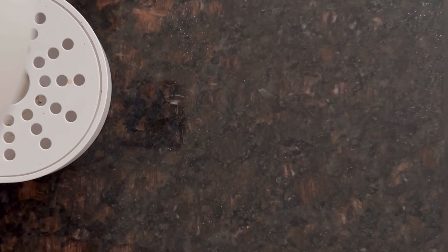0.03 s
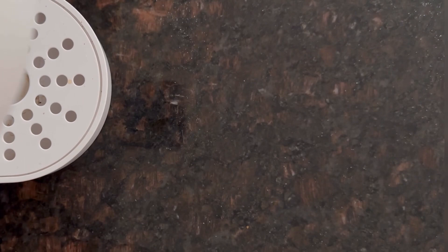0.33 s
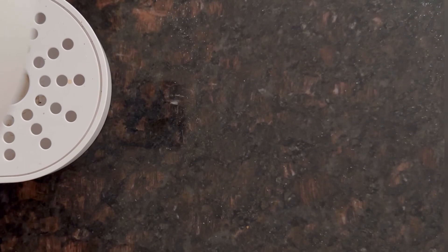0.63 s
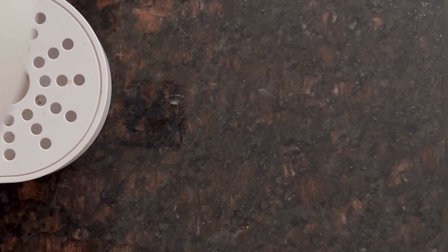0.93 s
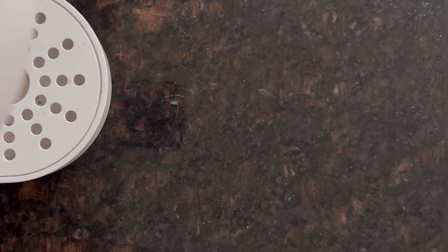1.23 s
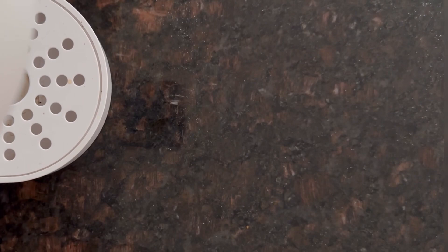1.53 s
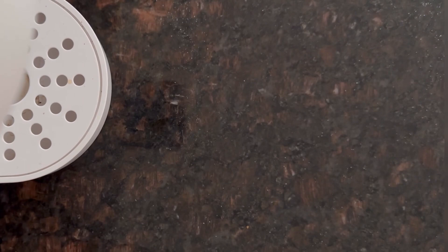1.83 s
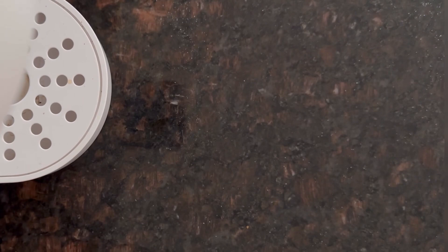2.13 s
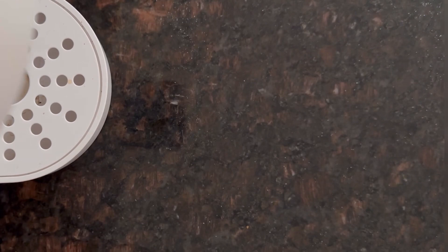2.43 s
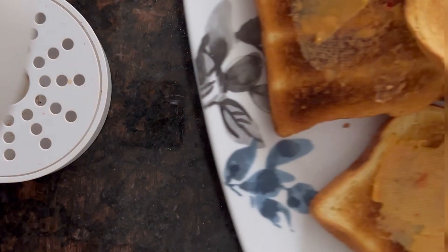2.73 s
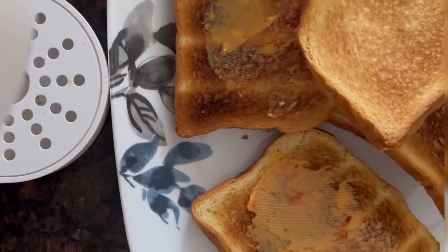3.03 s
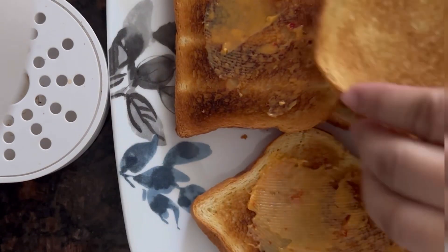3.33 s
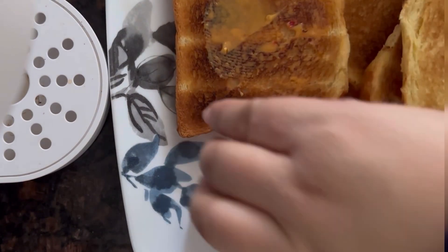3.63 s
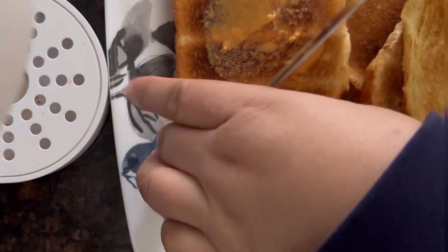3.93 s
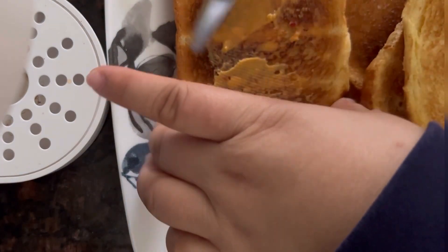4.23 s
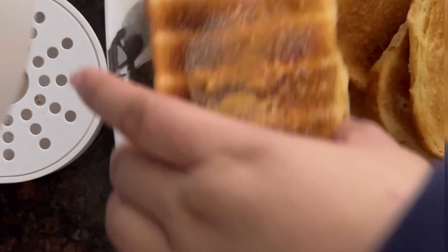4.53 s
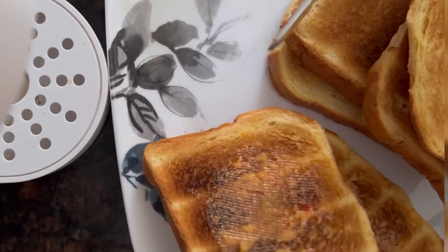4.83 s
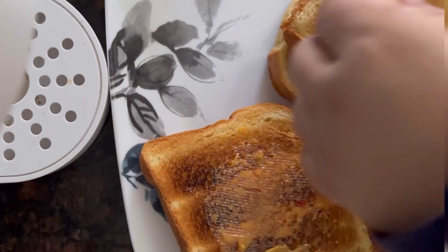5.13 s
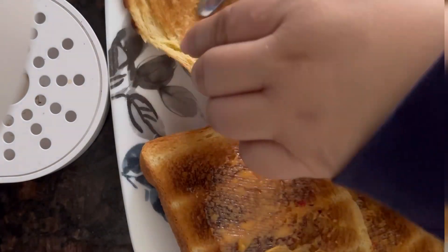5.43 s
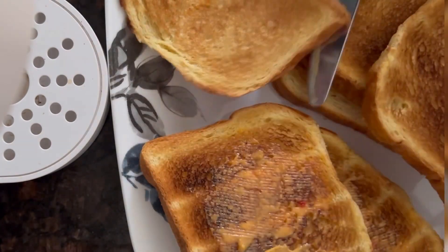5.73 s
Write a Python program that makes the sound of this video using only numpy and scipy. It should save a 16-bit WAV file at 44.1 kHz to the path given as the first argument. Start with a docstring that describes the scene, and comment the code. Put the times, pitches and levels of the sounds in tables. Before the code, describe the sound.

A china plate is set down on a stone counter, then toast rustles and a knife scrapes and clinks over a low appliance hum.

```python
"""Toast on a kitchen counter

An appliance hums in a small room. Sleeves rustle and things scuff softly as a plate of toast is
fetched. The china knocks on the stone counter, rings and slides into place. Dry slices rub and
crackle as they are shifted, and a table knife scrapes over one in four quick strokes and clinks on
the plate. Each rub is a stream of tiny slips; each knock is a short crack plus fading tones."""
import sys
import numpy as np
from scipy import signal
from scipy.fft import rfft, irfft, next_fast_len
from scipy.io import wavfile

SR = 44100
rng = np.random.default_rng(int(sys.argv[2]) if len(sys.argv) > 2 else 0)


def write(x):
    x = np.atleast_2d(x).T
    wavfile.write(sys.argv[1], SR, np.round(np.clip(x, -1, 1) * 32767).astype(np.int16))


N = 258867
TIME = np.arange(N) / SR

# Levels in the tables are relative. A "colour" says how strong a noise is from low to high pitch.
# slow swells of the motor note: time_s, level_db
MOTOR_SWELLS = [(0.1, -52.5), (0.3, -51.5), (0.7, -52.5), (1.09, -50), (1.94, -54.5), (2.18, -53),
                (2.36, -48.5), (2.77, -52), (3.11, -48), (3.72, -51), (4.41, -48.5), (5.06, -52.5),
                (5.43, -47.5), (5.75, -51)]
# wavering tones of the appliance: pitch_hz, width_hz, level_db
HUM_TONES = [(178, 58, -64.5), (360.6, 17, -65.5), (630, 32, -77)]
# colour of the rushing air: pitch_hz, level_db
AIR_COLOUR = [(25, -51), (55, -36), (90, -4.5), (130, 0.5), (200, -2.5), (300, -1), (450, -7.5), (700, -16),
              (1200, -21.5), (3000, -30.5), (5000, -29.5), (6700, -24), (9000, -32.5), (15000, -35)]

# moves of the sleeve and things handled nearby: start_s, rise_s, hold_s, swish_db, scuff_db, ring_db
HANDLING_MOVES = [(0.022, 0.027, 0.0059, -50.5, -55, -52), (0.108, 0.014, 0.0097, -65, -82, -83),
                  (0.24, 0.016, .05, -74, -75, -80), (0.35, 0.0085, .016, -66, -72, -84),
                  (0.381, 0.0067, 0.015, -52, -59, -57.5), (0.457, 0.0045, 0.0027, -55.5, -80, -90),
                  (0.775, 0.02, 0.05, -92, -73, -68), (0.909, 0.013, 0.025, -52.5, -50, -49),
                  (1.056, 0.017, 0.0091, -64.5, -56, -55.5), (1.09, 0.078, 0.045, -54.5, -63.5, -69),
                  (1.215, 0.027, 0.013, -51, -63.5, -57), (1.265, 0.015, 0.02, -62, -59, -61.5),
                  (1.321, .013, 0.011, -38, -39, -38), (1.385, 0.027, 0.014, -56, -52, -53),
                  (1.505, 0.023, .012, -59, -70.5, -65), (1.59, 0.023, .04, -55, -68.5, -86),
                  (1.92, 0.038, 0.068, -71, -94, -85), (2.04, 0.088, 0.011, -60, -75, -80),
                  (2.216, 0.011, 0.023, -77, -59, -73), (2.238, 0.014, 0.0092, -43, -60, -73),
                  (2.275, 0.027, 0.027, -56, -61.5, -80), (2.39, 0.016, 0.11, -68.5, -87, -74),
                  (2.503, 0.022, 0.0049, -51, -79, -79), (2.535, 0.019, 0.024, -53, -71, -75),
                  (2.662, 0.025, 0.02, -60.5, -70, -80)]
# colour of swishing cloth: pitch_hz, level_db
SWISH_COLOUR = [(290, -40.5), (500, -1.5), (807, -8.5), (1180, -34), (1510, -7), (2360, -4), (2730, -8),
                (3750, -4), (4280, -5.5), (6800, -4.5), (13400, -13), (16000, -17)]
# colour of a hollow scuff: pitch_hz, level_db
SCUFF_COLOUR = [(290, -4.5), (500, 0.5), (850, -8), (1060, 7), (1270, -4), (1420, -1.5), (1650, -12.5),
                (2050, -13.5), (2300, -5), (2600, -16), (4500, -10), (7000, -29)]
# hollow ring of the thing being scuffed: pitch_hz, width_hz, level_db
HOLLOW_TONES = [(1149.7, 70, -3), (1300, 130, -6), (1983, 120, -10.5)]
# two pushes of one light brushing sound: start_s, rise_s, hold_s, level_db
BRUSH_PUSHES = [(1.595, 0.044, 0.011, -49), (1.665, 0.0059, .014, -39)]
# colour of that brushing hiss: pitch_hz, level_db
BRUSH_COLOUR = [(590, -50), (1000, -26), (1320, -19), (1570, -9.5), (2050, -13), (5630, -6), (7190, -6),
                (10200, -1), (16000, -10.5)]
# soft taps as the plate is carried: start_s, level_db
CARRY_TAPS = [(2.224, -44), (2.261, -45.5), (2.489, -40.5), (2.52, -42.5), (2.669, -44.5)]
# colour of a soft tap: pitch_hz, level_db
TAP_COLOUR = [(250, -10), (450, 1), (650, 3), (950, 0.5), (1400, -15), (2500, -19), (6000, -26)]

# the plate hitting the counter: start_s, treble_db, thud_db, body_db, clack_db, edge_db
PLATE_KNOCKS = [(2.8249, -24, -30, -30, -27, -27), (2.8404, -42, -64.5, -41, -35, -32.5),
                (2.8805, -57, -46, -51.5, -47, -46.5), (2.9788, -14.5, -27.5, -35.5, -58, -30),
                (2.9848, -24.5, -28, -48.5, -34, -22.5), (3.0234, -56, -36, -58, -43.5, -66),
                (3.0756, -27.5, -35, -34.5, -44.5, -43.5), (3.1123, -57, -46, -49.5, -49, -65.5),
                (3.1714, -61, -54, -44.5, -78, -71.5)]
# tones of the plate on stone (a ring time is how long a 60 dB fade takes): pitch_hz, level_db, ring_s
PLATE_TONES = [(138.7, -2, 0.2), (248, 0.5, 0.075), (320, 6.5, 0.076), (369, -9, 0.07), (633, 8.5, 0.098),
               (895, -6.5, 0.08), (1214, -7, 0.049), (1493, 3, 0.034), (1955, -2, 0.1),
               (2230, -15.5, 0.097), (2820, -5, 0.027), (3110, -5, 0.035), (3400, -5, 0.062),
               (4550, -13.5, 0.017), (5280, -10.5, 0.037), (6030, -14.5, 0.041), (8560, -8, .035),
               (8950, -8, 0.019), (10560, -16, 0.02), (10800, -33.5, 0.027)]
# crack of china on stone: pitch_hz, level_db, ring_s
PLATE_CRACK = [(140, -13.5, 0.09), (390, -2.5, 0.089), (1005, -2.5, 0.07), (2510, -2, 0.025),
               (4200, -5, .018), (5480, -7, 0.014), (8800, -5, 0.0089), (15100, -13.5, 0.012)]
# the plate sliding on the counter: start_s, rise_s, hold_s, grit_db, body_db
PLATE_SLIDES = [(2.845, 0.0099, 0.01, -53, -46), (2.88, 0.02, 0.11, -52.5, -60),
                (2.96, .01, .004, -43, -44), (3.155, 0.023, 0.025, -51, -51),
                (3.21, .03, 0.058, -57, -54.5), (3.3, .02, 0.027, -63.5, -58)]
# colour of the plate dragging on its rim: pitch_hz, level_db
RIM_GRIT_COLOUR = [(710, -40.5), (1200, -9), (3310, -5), (3530, 2), (3880, -13), (6650, -12.5), (7790, -14),
                   (8570, -3), (9730, -10), (10700, 1), (11900, -21), (14400, -15.5), (15000, -29.5)]
# colour of the plate sliding while flat: pitch_hz, level_db
FLAT_GRIT_COLOUR = [(1180, -36), (2000, -7.5), (3870, -3), (4300, -6.5), (6940, 3), (7640, -3.5),
                    (12400, -7.5), (14500, -18), (16000, -74.5)]
# colour of the low rumble of the slide: pitch_hz, level_db
SLIDE_BODY_COLOUR = [(150, -28), (250, 0), (518, -6.5), (632, -3), (771, -17), (972, -7), (1090, -20),
                     (2350, -17.5), (2870, -50), (3500, -25.5), (4550, -73.5), (7700, -120)]

# crumbs snapping and the blade touching the crust: start_s, level_db
CRUMB_SNAPS = [(3.157, -43), (3.5952, -22.5), (3.6945, -25.5), (4.0315, -26), (4.1485, -23), (4.1575, -38),
               (4.2772, -21.5), (4.2912, -11.5), (4.3977, -18), (4.8293, -36.5), (4.846, -36),
               (5.0425, -31.5), (5.243, -39), (5.313, -43), (5.4335, -34.5), (5.5502, -35), (5.6829, -39.5),
               (5.6977, -37), (5.7321, -35.5)]
# colour of a snapping crumb: pitch_hz, level_db
SNAP_COLOUR = [(300, -38), (900, -5), (1550, -7), (2100, -13.5), (3500, -0.5), (5000, -4), (7500, 0.5),
               (9500, -13.5), (13000, -9.5), (16000, -24)]
# slices sliding over each other: start_s, rise_s, hold_s, crust_db, shuffle_db
SLICE_MOVES = [(3.44, 0.018, .004, -57, -78.5), (3.588, 0.0088, .008, -45.5, -57.5),
               (3.62, 0.02, 0.011, -52.5, -58), (3.66, 0.015, 0.046, -53, -60),
               (3.72, 0.015, 0.045, -68.5, -60), (3.815, 0.017, 0.03, -54.5, -59.5),
               (3.87, .012, 0.031, -48.5, -65), (3.915, 0.0076, 0.0055, -58, -58),
               (4.005, 0.013, .01, -64.5, -56), (4.355, .02, .012, -65, -70), (4.42, 0.029, .008, -63, -56),
               (4.5, 0.035, 0.12, -72, -59.5), (4.558, 0.0029, 0.0026, -51, -57),
               (4.855, 0.018, .014, -51.5, -55), (4.976, 0.011, 0.0059, -59, -63),
               (5.018, .006, 0.0047, -57, -56), (5.11, 0.047, 0.054, -43, -58.5),
               (5.212, 0.0092, 0.0025, -58, -54), (5.24, 0.001, 0.0029, -38.5, -48.5),
               (5.252, 0.0047, 0.0024, -68, -63), (5.428, 0.015, 0.037, -46, -54.5),
               (5.495, 0.015, 0.011, -49, -63), (5.54, 0.0077, 0.048, -65, -59),
               (5.742, 0.012, .008, -51.5, -56.5)]
# colour of dry crusts rubbing: pitch_hz, level_db
CRUST_COLOUR = [(530, -44), (900, 5), (1310, 0), (1550, 3.5), (1830, 2), (1970, 4), (2250, -0.5),
                (4100, -2), (4520, -4), (6250, 1), (7310, 3.5), (10500, -5), (12600, -1.5), (16000, -11)]
# dull colour of the soft bread: pitch_hz, level_db
BREAD_COLOUR = [(120, -22), (280, 2.5), (450, -2), (650, -0.5), (850, -11.5), (1300, -32), (3000, -58)]
# soft squeaks of rubbed china: start_s, length_s, pitch_hz, level_db
CHINA_SQUEAKS = [(3.594, 0.017, 1530, -43.5), (3.588, 0.028, 4700, -43), (3.59, 0.024, 7900, -40),
                 (3.631, 0.022, 3540, -51), (3.68, 0.036, 5430, -53.5), (3.703, 0.061, 2050, -57),
                 (4.742, 0.07, 2140, -56.5), (4.749, 0.051, 3800, -70.5), (5.146, 0.11, 3930, -48)]

# the knife hitting the plate: start_s, treble_db, thud_db, body_db, clack_db, edge_db
KNIFE_CLINKS = [(3.5179, -37.5, -57.5, -46, -49, -49), (5.3257, -35, -35, -48, -46, -45),
                (5.3662, -48, -46, -59, -57.5, -58), (5.8313, -10, -37.5, -29.5, -33.5, -33)]
# tones of the knife against china: pitch_hz, level_db, ring_s
KNIFE_TONES = [(495, -3, 0.089), (626, -4.5, 0.29), (993, -0.5, 0.078), (1635, 0.5, 0.037),
               (1992, -8.5, 0.2), (2884, -2, 0.09), (3390, -19, 0.013), (5480, -3, 0.0096),
               (7300, -15, 0.054), (8700, -18, 0.043), (10300, -31, .06), (12600, -15.5, 0.048),
               (14600, -27, 0.067)]
# crack of steel on china: pitch_hz, level_db, ring_s
KNIFE_CRACK = [(149, -11, 0.067), (590, 0.5, 0.061), (2550, -1.5, 0.054), (5940, -3, 0.0084),
               (8900, -5.5, 0.018), (15000, -7, 0.0067)]
# the knife scraping the toast: start_s, rise_s, hold_s, level_db
KNIFE_STROKES = [(4.029, 0.027, 0.0078, -28.5), (4.155, 0.0028, 0.029, -28.5),
                 (4.282, 0.0081, 0.0044, -25.5), (4.305, 0.019, 0.0041, -39.5), (4.403, 0.012, 0.0051, -25)]
# colour of long strokes with the flat blade: pitch_hz, level_db
FLAT_BLADE_COLOUR = [(290, -7.5), (500, -10), (621, -4.5), (729, -24), (1020, 0.5), (1190, -6),
                     (1870, -0.5), (2810, -5.5), (3340, 2), (3590, -5), (4800, 1.5), (6800, -3), (7860, -1),
                     (12300, -2), (16000, -14.5)]
# colour of short flicks with the edge: pitch_hz, level_db
BLADE_EDGE_COLOUR = [(290, -49), (500, -21.5), (761, -24.5), (933, -3), (1160, -7.5), (1980, -0.5),
                     (2610, -8.5), (3920, -8), (7640, 0), (9220, -11), (16000, -14.5)]

# how much the left and right sides differ: pitch_hz, side_level_db
STEREO_WIDTH = [(30, -12), (100, -25), (300, -15), (700, -3), (1400, -0.5), (2500, 8), (4500, -5.5),
                (6500, -19), (8500, 3), (15000, 0)]


def from_db(db):
    """Turn decibels into a number to multiply a sound by."""
    return 10 ** (np.asarray(db) / 20)


def rms_one(x):
    """Scale a sound so that its average power is 1."""
    return x / np.sqrt(np.mean(x ** 2) + 1e-20)


def at_hz(table, hz, column=1):
    """Look up a table's value at a pitch, gliding between its rows."""
    table = np.array(table)
    return np.interp(np.log(hz + 1e-9), np.log(table[:, 0]), table[:, column])


def colour(x, spectrum):
    """Turn each pitch in a sound up or down as a colour table says."""
    size = next_fast_len(len(x), True)
    gain = from_db(at_hz(spectrum, np.arange(size // 2 + 1) * SR / size))
    return irfft(rfft(np.float32(x), size) * np.float32(gain), size)[:len(x)]


def add(track, start_s, sound):
    """Mix a sound into a track at the given time."""
    start = round(start_s * SR)
    track[start:start + len(sound)] += sound[:N - start]


def wander(per_s):
    """A random value that glides to a new place per_s times a second."""
    steps = rng.standard_normal(int(TIME[-1] * per_s) + 2)
    return rms_one(np.interp(TIME * per_s, np.arange(len(steps)), steps))


def narrow_noise(hz, width_hz):
    """Noise gathered around one pitch, like an unsteady tone."""
    size = next_fast_len(N)
    offset = (np.arange(size // 2 + 1) * SR / size - hz) / width_hz
    peak = rfft(rng.standard_normal(size)) / (1 + (2 * offset) ** 2)
    return rms_one(irfft(peak, size)[:N])


def reflections(x, ring_s, delay_s=0):
    """A dense, dying spray of echoes, about as strong as the sound itself."""
    t = TIME[:int(ring_s * SR)]
    echoes = rng.standard_normal(len(t)) * from_db(-60 * t / ring_s) * (t > delay_s)
    echoes /= np.sqrt(np.sum(echoes ** 2))
    return signal.oaconvolve(np.float32(x), np.float32(echoes))[:N]


def gesture(rubs, fade_db_per_s, swell_db, column=3):
    """Loudness over time: each rub swells as the hand presses, holds its column's level, then fades."""
    power, t = np.zeros(N), TIME[:SR]
    for rub, fade in zip(rubs, np.broadcast_to(fade_db_per_s, len(rubs))):
        start_s, rise_s, hold_s = rub[:3]
        rise_left = np.maximum(1 - t / max(rise_s, .002), 0)
        fading_s = np.maximum(t - rise_s - hold_s, 0)
        db = rub[column] - swell_db * rise_left ** 2 - fade * fading_s
        add(power, start_s, from_db(db) ** 2)
    return np.sqrt(power)


def friction(spectrum, slips_per_s, spread_db, smooth, clump_db=1.5, ragged=0.66):
    """Rubbing: clumps of tiny slips over a smooth hiss; spread_db makes the slips uneven in size."""
    sizes = from_db(spread_db * np.minimum(rng.exponential(1, N), 3)) * rng.choice([-1, 1], N)
    slips = rms_one(sizes * (rng.random(N) < slips_per_s / SR))
    rub = slips + smooth * rng.standard_normal(N)
    rub *= from_db(clump_db * wander(400))
    # close echoes shift with the hand and make the colour ragged
    echoes = sum(wander(8) * reflections(rub, ring_s=.012, delay_s=.0005) for _ in range(4)) / 2
    bass_cut = signal.butter(2, 170, "high", fs=SR, output="sos")
    return rms_one(colour(signal.sosfilt(bass_cut, rub + ragged * echoes), spectrum))


def bursts(events, spectrum, ring_s, gain_db):
    """Small taps or snaps: each is a puff of noise that dies at once."""
    out, t = np.zeros(N), TIME[:SR // 5]
    for start_s, db in events:
        puff = rms_one(colour(rng.standard_normal(len(t)), spectrum))
        add(out, start_s, from_db(db + gain_db - 60 * t / ring_s) * puff)
    return out


def blows(events, tones, crack, ring_db, crack_db, lag_cycles):
    """Hard hits: ringing tones and a short crack. How a hit lands sets its force at each pitch."""
    out, t = np.zeros(N), TIME[:SR // 3]
    band_edges_hz = np.geomspace(100, 16500, 14)
    for start_s, treble_db, thud_db, body_db, clack_db, edge_db in events:
        force = [(400, thud_db), (600, body_db), (800, body_db), (1200, clack_db), (2100, clack_db),
                 (2800, edge_db), (3600, edge_db), (4500, treble_db)]
        for k, (hz, db, ring_s) in enumerate(tones):
            strength = from_db(ring_db + db + at_hz(force, hz) + rng.normal(0, 1)) * (-1) ** k
            swell = 1 - np.exp(-2 * t * hz)   # each tone takes about one cycle to get going
            tone = np.sin(2 * np.pi * hz * t) * from_db(-60 * t / ring_s)
            add(out, start_s + lag_cycles / hz, strength * swell * tone)
        for low, high in zip(band_edges_hz, band_edges_hz[1:]):
            hz = np.sqrt(low * high)
            burst = rng.standard_normal(len(t)) * from_db(-60 * t / at_hz(crack, hz, column=2))
            band = signal.sosfilt(signal.butter(2, [low, high], "band", fs=SR, output="sos"), burst)
            band *= np.sqrt(SR / 2 / (high - low))   # narrow and wide bands start equally strong
            add(out, start_s, band * from_db(crack_db + at_hz(crack, hz) + at_hz(force, hz)))
    return out


def appliance():
    """A motor hums one slowly swelling note, with wavering tones and a soft rush of air."""
    pitch_hz = 175.2 + 0.42 * narrow_noise(0, width_hz=5.2)
    phase = 2 * np.pi * np.cumsum(pitch_hz) / SR
    swell = from_db(np.interp(TIME, *np.transpose(MOTOR_SWELLS)))
    motor = from_db(-50.5) * rms_one(swell * np.sin(phase))
    tones = sum(from_db(db) * narrow_noise(hz, width) for hz, width, db in HUM_TONES)
    air = from_db(-63) * rms_one(colour(rng.standard_normal(N), AIR_COLOUR))
    return motor + tones + air


def handling():
    """Fetching the plate: cloth swishes, hollow scuffs, a muffled bump, a light brush and soft taps."""
    fade_db_per_s = 283.5
    swish = from_db(-0.8) * gesture(HANDLING_MOVES, fade_db_per_s, swell_db=25)
    swish *= friction(SWISH_COLOUR, slips_per_s=1400, spread_db=2.5, smooth=1.0)
    scuff = gesture(HANDLING_MOVES, fade_db_per_s, swell_db=42, column=4)
    scuff *= friction(SCUFF_COLOUR, slips_per_s=1200, spread_db=2, smooth=0.84)
    ring = gesture(HANDLING_MOVES, fade_db_per_s, swell_db=34, column=5)
    ring *= sum(from_db(db) * narrow_noise(hz, width) for hz, width, db in HOLLOW_TONES)
    bump_start_s, bump_length_s, bump_hz = 1.375, .07, 208
    t = TIME[:int(bump_length_s * SR)]
    add(scuff, bump_start_s, from_db(-38.5) * np.hanning(len(t)) * np.sin(2 * np.pi * bump_hz * t))
    brush = from_db(-2) * gesture(BRUSH_PUSHES, fade_db_per_s=355, swell_db=26)
    brush *= friction(BRUSH_COLOUR, slips_per_s=9400, spread_db=0, smooth=0.61, clump_db=0)
    taps = bursts(CARRY_TAPS, TAP_COLOUR, ring_s=0.12, gain_db=-6.5)
    return swish + scuff + ring + brush + taps


def plate():
    """The plate touches down on the stone, drags on its rim, drops flat and is nudged into place."""
    drops_flat_s, fade_db_per_s = 3.0, 298
    on_rim = friction(RIM_GRIT_COLOUR, slips_per_s=1000, spread_db=2.5, smooth=.5, clump_db=3, ragged=.2)
    lying_flat = friction(FLAT_GRIT_COLOUR, slips_per_s=3200, spread_db=1, smooth=0.94)
    grit = gesture(PLATE_SLIDES, fade_db_per_s, swell_db=15)
    grit *= np.where(TIME < drops_flat_s, on_rim, lying_flat)
    body = gesture(PLATE_SLIDES, fade_db_per_s, swell_db=16.5, column=4)
    body *= friction(SLIDE_BODY_COLOUR, slips_per_s=360, spread_db=0, smooth=1.0)
    knocks = blows(PLATE_KNOCKS, PLATE_TONES, PLATE_CRACK, ring_db=-5, crack_db=-0.5, lag_cycles=0.74)
    return grit + body + knocks


def toast():
    """Dry crusts rub and crackle over the dull shuffle of bread; the china beneath squeaks faintly."""
    crumbs_per_s, fade_db_per_s = 55, 561
    crumbs = rng.standard_normal(N) * (rng.random(N) < crumbs_per_s / SR)
    crackle = from_db(-12) * rms_one(colour(reflections(crumbs, ring_s=0.015), SNAP_COLOUR))
    rub = from_db(-1) * friction(CRUST_COLOUR, slips_per_s=1100, spread_db=5, smooth=0.86, ragged=0.37)
    crust = gesture(SLICE_MOVES, fade_db_per_s, swell_db=22.5) * (rub + crackle)
    shuffle = gesture(SLICE_MOVES, fade_db_per_s, swell_db=17, column=4)
    shuffle *= friction(BREAD_COLOUR, slips_per_s=1200, spread_db=0, smooth=0.76, ragged=0.35)
    squeaks = np.zeros(N)
    for start_s, length_s, hz, db in CHINA_SQUEAKS:
        swell = np.hanning(int(min(length_s, .09) * SR))   # no squeak lasts over 0.09 s
        add(squeaks, start_s, from_db(db) * swell * narrow_noise(hz, width_hz=0.2 * hz)[:len(swell)])
    snaps = bursts(CRUMB_SNAPS, SNAP_COLOUR, ring_s=0.019, gain_db=-11)
    return crust + shuffle + squeaks + snaps


def knife():
    """The blade rasps over the crust, first flat, then with its edge; at times it hits the plate."""
    turns_s = 4.25
    flat_fade_db_per_s, edge_fade_db_per_s = 763, 1500   # the flat blade eases off, the edge flicks clear
    flat = friction(FLAT_BLADE_COLOUR, slips_per_s=3000, spread_db=1, smooth=0.39, ragged=0.2)
    edge = friction(BLADE_EDGE_COLOUR, slips_per_s=3000, spread_db=5, smooth=1.0, ragged=0.41)
    # the bread gives under the blade
    bread = from_db(-21.5) * rms_one(colour(rng.standard_normal(N), BREAD_COLOUR))
    fades = [flat_fade_db_per_s if row[0] < turns_s else edge_fade_db_per_s for row in KNIFE_STROKES]
    rasp = gesture(KNIFE_STROKES, fades, swell_db=23.5) * (np.where(TIME < turns_s, flat, edge) + bread)
    clinks = blows(KNIFE_CLINKS, KNIFE_TONES, KNIFE_CRACK, ring_db=-2.5, crack_db=-5.5, lag_cycles=0.69)
    return rasp + clinks


def in_room(x, echo_db):
    """Add the short echo of the kitchen to a sound."""
    return x + from_db(echo_db) * reflections(x, ring_s=0.17, delay_s=0.0063)


def scene():
    """Mix it all: plate, toast and knife sound central, the handling wider."""
    handled = in_room(handling(), echo_db=-10.5)
    on_counter = in_room(plate() + knife() + toast(), echo_db=-14.5)
    hum = appliance()
    middle = handled + on_counter + hum
    # a wavering phase shift and a short smear make left and right differ a little
    spread = from_db(-1.5) * handled + from_db(-7.5) * on_counter + hum
    shifted = signal.hilbert(spread, next_fast_len(N)).imag[:N]   # every wave moved by a quarter cycle
    side = colour(.7 * wander(40) * shifted + .5 * reflections(spread, ring_s=.09), STEREO_WIDTH)
    return np.array([middle + side, middle - side])


def record(dry):
    """The small microphone loses the deep bass; the highest treble is cut steeply."""
    bass_cut = signal.butter(2, 60, "high", fs=SR, output="sos")
    treble_cut = signal.ellip(10, .1, 80, 16100, fs=SR, output="sos")
    return signal.sosfilt(treble_cut, signal.sosfilt(bass_cut, dry))


dry = scene()
out = record(dry)
write(out)
```